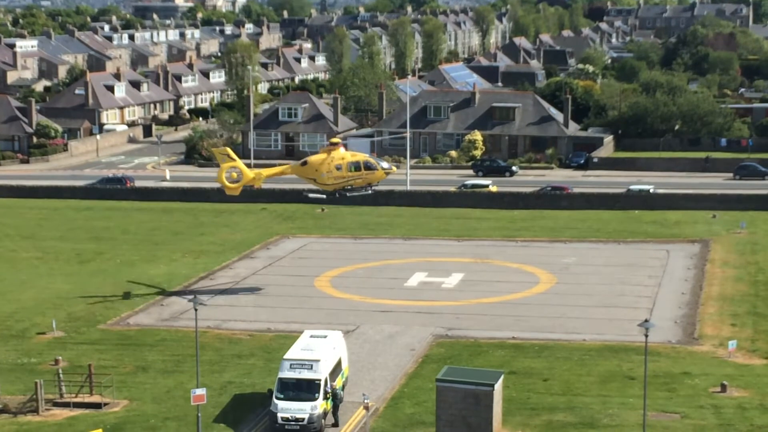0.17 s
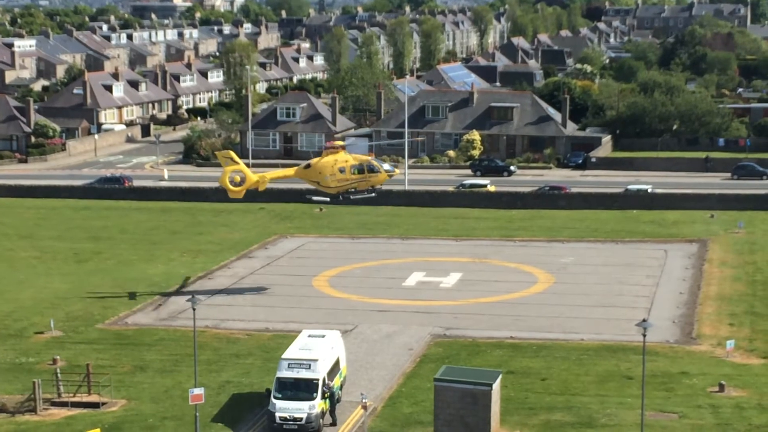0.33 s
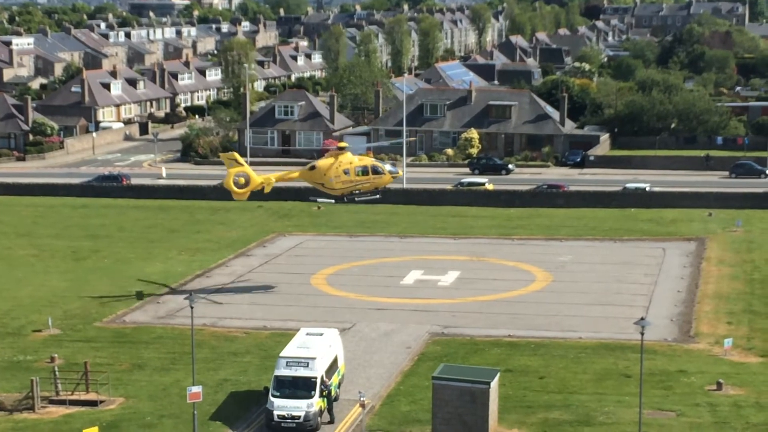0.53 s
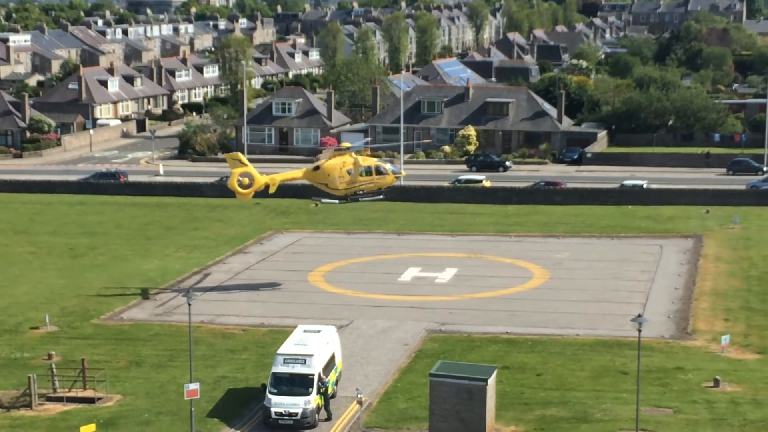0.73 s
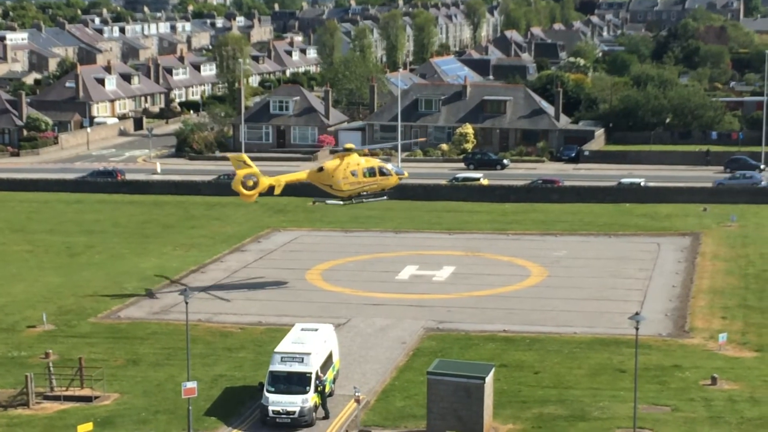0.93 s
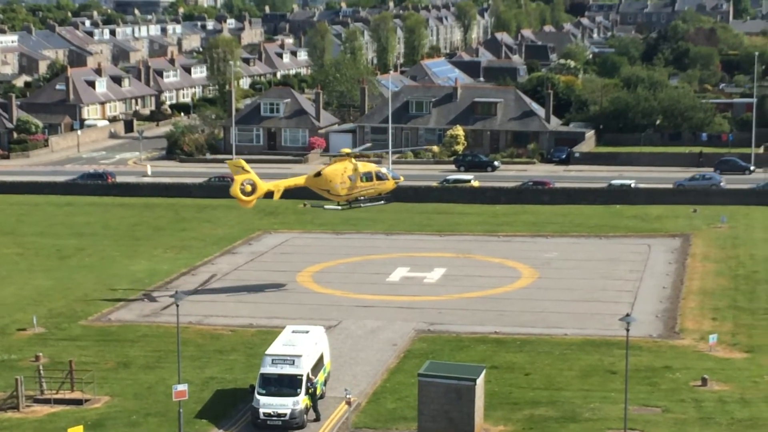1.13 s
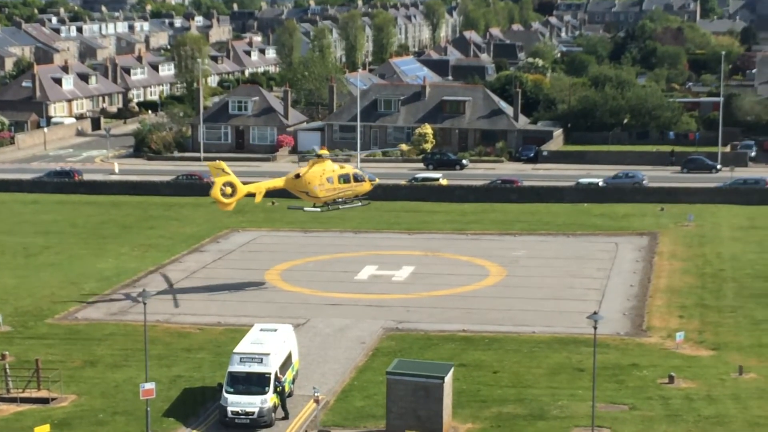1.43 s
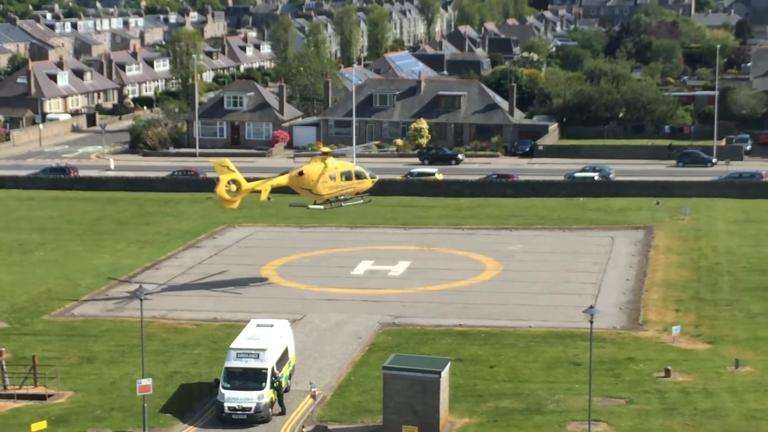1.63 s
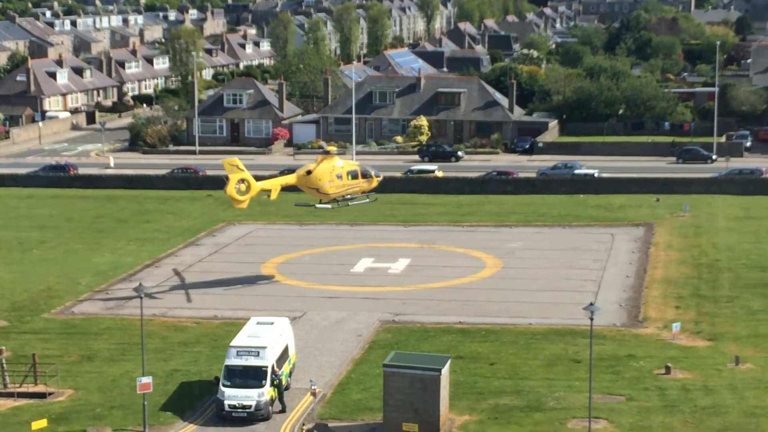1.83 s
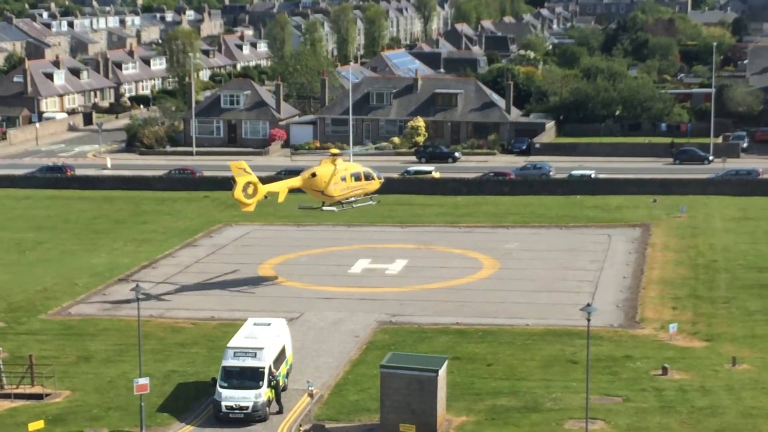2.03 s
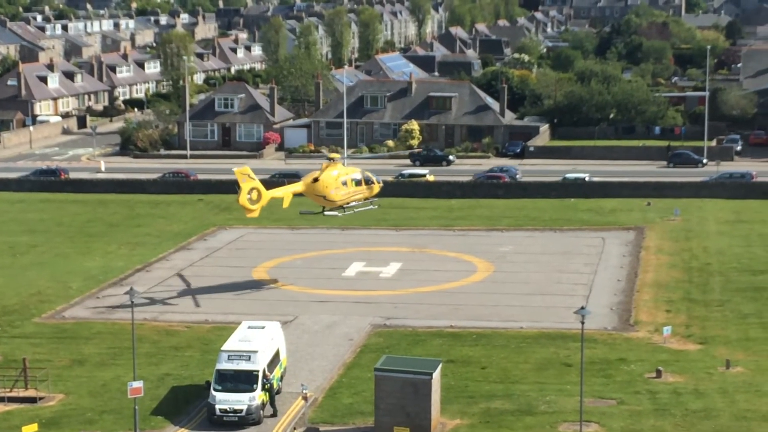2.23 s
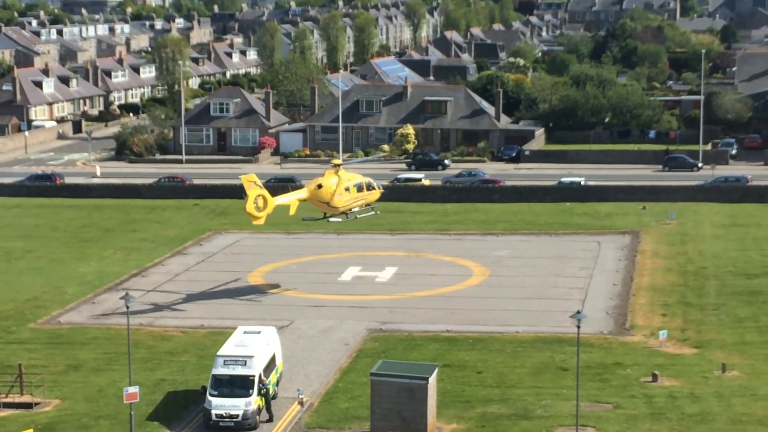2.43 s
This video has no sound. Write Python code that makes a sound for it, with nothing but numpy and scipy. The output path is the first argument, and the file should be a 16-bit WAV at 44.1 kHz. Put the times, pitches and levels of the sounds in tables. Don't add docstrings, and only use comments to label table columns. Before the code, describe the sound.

A distant helicopter hovers over an open lawn, a deep, rapid rotor drone swelling and dipping, with thin fuzzy fan and turbine whistles, heard from a high window over low air rumble and dull town wash.

```python
import sys
import numpy as np
from scipy import signal
from scipy.fft import next_fast_len
from scipy.io import wavfile
from scipy.ndimage import uniform_filter1d

SR = 44100
rng = np.random.default_rng(int(sys.argv[2]) if len(sys.argv) > 2 else 0)


def generate_wav(signal):
    frames = np.transpose(np.atleast_2d(signal))
    scaled = np.clip(frames, -1, 1) * 32767
    pcm = np.round(scaled).astype(np.int16)
    wavfile.write(sys.argv[1], SR, pcm)


def natural_amplitude(level_db):
    exponent = np.asarray(level_db, float) / 20
    return 10 ** exponent


N = 113778
T = np.arange(N) / SR
BLADE_HZ, SPEED_UP = 27.43, 0.0593


def evened(x):
    return x / np.sqrt(np.mean(abs(x) ** 2) + 1e-20)


def curve(rows, column):
    rows = np.array(rows, float)
    return np.interp(T, rows[:, 0], rows[:, column])


def drift(top_hz):
    t = T[::64, None]
    jitter, phase = rng.random((2, 24))
    hz = top_hz * (np.linspace(-1, 1, num=24) + (jitter - 0.5) / 12) ** 3
    z = evened(np.exp(2j * np.pi * (hz * t + phase)).sum(axis=1))
    return np.interp(T, t[:, 0], z.real) + 1j * np.interp(T, t[:, 0], z.imag)


def swells(rows, which):
    total = 0
    for k, centre, length, db in rows:
        if round(k) == which:
            total = total + db * np.cos(np.pi * np.clip((T - centre) / length, -0.5, 0.5)) ** 2
    return total


# time in seconds, facing in dB, thump level in dB.
TURN = [(0, 0, -54.5), (.4, -2, -58), (.65, 0.5, -55), (.82, -3, -48), (1.0, 1, -53), (1.25, 2.5, -56.5),
        (1.55, 2, -53.5), (1.8, -9.5, -48), (2.1, -9.5, -51), (2.35, -9, -46.5), (2.58, -9.5, -51)]


def facing():
    return curve(TURN, 1)


def blade_phase():
    return 2 * np.pi * (BLADE_HZ + SPEED_UP * T / 2) * T


def thump():
    tone = (1 + 0.34 * drift(8.0)) * np.exp(2j * blade_phase())
    return natural_amplitude(curve(TURN, 2)) * tone.real


# time in seconds, pitch in Hz, level in dB.
BOOM = [(0, 189.5, -35), (.06, 189.7, -28), (.16, 188.8, -42), (.22, 190.2, -34.5), (.36, 191.5, -29),
        (.56, 192.5, -34.5), (.61, 192.5, -28.5), (.85, 190.2, -32), (.9, 190, -41), (.97, 190.3, -34.5),
        (1.11, 190.6, -40.5), (1.36, 191.9, -33), (1.74, 191.7, -32), (2.01, 191.9, -39.5),
        (2.1, 191.9, -35), (2.18, 191.9, -40), (2.29, 191.8, -37), (2.58, 192.5, -47.5)]
# blade order, centre in seconds, length in seconds, change in dB.
NULLS = [(7, 0.027, 0.05, 3), (7, .99, .14, 3), (7, 1.88, .1, 3), (7, 2.1, .1, 2), (7, .26, .1, 0.5),
         (7, .68, 0.074, -1), (7, 1.2, .08, -11), (7, 1.2, 0.13, 3), (7, 1, 0.12, -3), (7, 1.82, 0.1, -9),
         (7, 2.4, 0.074, -9), (7, 2.7, 0.11, -15), (7, 2.47, 0.1, 2)]


def bay_boom():
    flutter = 1 + 0.15 * drift(11)
    tone = flutter * np.exp(2j * np.pi * np.cumsum(curve(BOOM, 1)) / SR)
    return natural_amplitude(curve(BOOM, 2) + swells(NULLS, 7)) * tone.real


# order as a multiple of the beat, level in dB.
BLADES = [(3, -60), (4, -61.5), (5, -55), (6, -54), (8, -54), (9, -60), (11, -54.5), (12, -55.5),
          (13, -56.5), (14, -58.5), (15, -62), (16, -69), (17, -69), (18, -57.5), (19, -63.5), (20, -60),
          (21, -68), (22, -74.5), (24, -73.5)]
# blade order, centre in seconds, length in seconds, change in dB.
GLINTS = [(5, 0.25, 0.71, 5), (5, .5, 0.22, 11), (18, 2.52, .15, 7), (11, 2.0, .6, -3), (6, 1.58, .12, 5),
          (5, 2.9, 0.18, 2), (5, .73, .1, 6), (5, 1.2, .2, -6), (5, 2.5, .2, -5), (8, 2.45, .2, -6),
          (5, 1.45, .5, -6.5), (6, 0.058, 0.22, 4), (6, .78, .25, 3.5), (6, 1.85, .9, 4.5), (8, 0.4, .2, 4),
          (8, 0.74, 0.62, 7.5), (8, 1.55, .15, 4), (8, 2.6, .15, 11.5), (8, 1.5, 0.28, -10),
          (11, .05, 0.25, 2), (11, .75, 0.17, -10), (11, 1.05, .3, 4), (11, 1.35, 0.17, -7),
          (11, 1.55, .15, 5), (12, 0.11, 0.69, 5), (12, 0.562, .15, 3.5), (12, .85, 0.5, -8.5),
          (12, 1.19, 0.31, 1.5), (13, .65, 0.28, 3.5), (13, 1.15, 0.73, 2.5), (13, 1.8, 0.6, 6.5),
          (14, .15, .2, 3), (14, 1.33, 0.2, 8), (14, .85, 0.45, -5.5), (15, 1.15, .5, 3.5),
          (16, 1.34, 0.18, 10.5), (18, 0.45, .25, 5), (18, .85, 0.19, 6), (18, 1.186, 0.13, 5),
          (18, 1.7, .3, 2.5), (18, 0.68, .15, -6.5), (19, 0.65, .3, 2.5), (19, 0.95, 0.18, 7),
          (19, 1.45, .2, 7.5), (20, .62, 0.3, 8.5), (20, 0.58, 0.12, -5), (20, 0.2, 0.12, -3),
          (20, 1, 0.13, 5), (20, 1.1, .3, 1)]


def blade_orders():
    steady, fade_hz = 1.7, 9.0
    phase_spread = 1.8
    phase = blade_phase()
    out = np.zeros(N)
    for order, db in BLADES:
        share = np.clip((order - 4) / 8, 0, 1)
        level = db + share * facing() + swells(GLINTS, round(order))
        tone = np.exp(1j * (round(order) * phase + phase_spread * rng.standard_normal()))
        paths = (steady + drift(fade_hz)) * tone
        out = out + natural_amplitude(level) * paths.real / np.hypot(steady, 1)
    return out


# time in seconds, level in dB.
ECHO = [
    (0, -50),
    (.2, -42),
    (.45, -46.5),
    (.52, -60.5),
    (1.0, -56),
    (1.12, -52),
    (1.5, -41.5),
    (1.75, -46.5),
    (1.9, -54),
    (2.58, -68),
]


def wall_echo():
    tone = (1 + 0.088 * drift(11.0)) * np.exp(10j * blade_phase())
    return natural_amplitude(curve(ECHO, 1)) * tone.real


def rotor():
    return np.sqrt(2) * (thump() + bay_boom() + blade_orders() + wall_echo())


def resonate(x, hz, width):
    carrier = np.exp(2j * np.pi * hz * T)
    r = np.exp(-np.pi * abs(width) / SR)
    smooth = signal.lfilter([1], np.convolve([1, -r], [1, -r]), x / carrier)
    return (carrier * smooth).real


def narrow_band(hz, width):
    return evened(resonate(rng.standard_normal(N), hz, width))


def whistle(hz, width):
    band = signal.hilbert(narrow_band(hz, width), next_fast_len(N))[:N]
    return evened((band / (abs(band) + 0.2) ** 0.6).real)


def blade_chop():
    return 1 + 0.15 * np.cos(2 * np.pi * BLADE_HZ * T)


# pitch in Hz, width in Hz, level in dB, share of facing from 0 to 1.
WHISTLES = [
    (748, 5.8, -69, 0.46),
    (803, 17, -65, 0.34),
    (866, 40, -67, 0.22),
    (949.3, 48, -63.5, 0.48),
    (1128, 29, -63, 0.54),
]
# whistle number, centre in seconds, length in seconds, change in dB.
FLARES = [(0, 1.1, .9, 3), (1, 1.5, 0.16, 6), (1, 1.72, .12, 8), (1, 1.0, .2, -10), (2, 1.35, .2, 5.5),
          (3, 1.2, .2, 6), (3, 1.22, .25, -5), (1, .55, .2, -3), (4, .62, .12, 4), (3, 1.3, .14, 9),
          (3, 0.54, 1.0, -6.5), (3, 2.15, .4, 6), (4, 0.995, 0.13, 3), (4, 1.4, 0.3, 2),
          (4, 0.895, 0.14, -4), (4, 1.95, .6, -7), (4, 2.45, .3, 4.5), (9, 1.97, 0.2, 9.5),
          (9, 1.16, 0.18, 6), (9, .03, .1, 6)]


def fan_whistles():
    out = np.zeros(N)
    for k, (hz, width, db, share) in enumerate(WHISTLES):
        waver = 1.0 * drift(4.0).real
        level = db + share * facing() + waver + swells(FLARES, k)
        out = out + natural_amplitude(level) * whistle(hz, width)
    return out * blade_chop()


# pitch in Hz, width in Hz, level in dB.
WHINES = [
    (1954, 80, -68.5),
    (2050, 130, -67.5),
    (2185, 250, -71.5),
    (2382, 28, -72.5),
    (3540, 99, -81),
]
# time in seconds, level in dB.
EXHAUST = [(0, 4.5), (.2, -4.5), (.48, 4.5), (.85, -4.5), (1.22, 2), (1.45, -2), (1.7, 0), (1.8, -1),
           (2.0, 2), (2.12, -0.5), (2.28, 5.5), (2.45, -7), (2.58, -9)]


def turbine_whines():
    out = np.zeros(N)
    for k, (hz, width, db) in enumerate(WHINES, len(WHISTLES)):
        waver = 0.94 * drift(14.0).real
        level = db + curve(EXHAUST, 1) + waver + swells(FLARES, k)
        out = out + natural_amplitude(level) * narrow_band(hz, width)
    return out * blade_chop()


# start in seconds, peak level in dB, pitch in Hz.
PUFFS = [(0.0403, -52.5, 1960), (0.1281, -54, 1950), (0.156, -54, 2010), (0.2627, -51.5, 1970),
         (0.3252, -54.5, 1870), (0.4194, -52, 2090), (0.4728, -49, 1980), (0.7068, -56, 2010),
         (0.7437, -49, 1930), (0.7701, -50, 2060), (0.8026, -52, 2170), (0.9467, -55, 2010),
         (1.0181, -52, 2020), (1.0964, -50, 2140), (1.1218, -48, 2026), (1.1837, -49.5, 1960),
         (1.2231, -48, 2040), (1.258, -54, 2084), (1.3848, -49, 2050), (1.442, -48.5, 1940),
         (1.5748, -46.5, 1990), (1.6566, -49, 1990), (1.6954, -44, 1982), (1.721, -45, 1940),
         (1.8317, -49, 2000), (1.938, -48.5, 2120), (1.9594, -53, 2040), (2.0253, -48, 2074),
         (2.0627, -51.5, 2150), (2.1949, -51, 2000), (2.2179, -51, 2050), (2.2492, -54, 1960),
         (2.2682, -46, 2070), (2.4578, -56, 2070)]


def exhaust_puffs():
    length, trim_db = 0.021, -4.5
    out = np.zeros(N + SR)
    t = np.arange(0, length, 1 / SR)
    envelope = np.sin(np.pi * t / length) ** 2
    for (start, db, hz), phase in zip(PUFFS, rng.random(len(PUFFS))):
        at = round(start * SR)
        out[at:at + len(t)] += natural_amplitude(db + trim_db) * envelope * np.sin(2 * np.pi * (hz * t + phase))
    return out[:N]


def noise(shape, patchy_db, follow):
    frames, hz = N // 512 + 5, np.fft.rfftfreq(2048, 1 / SR)
    real, imaginary, patches = rng.standard_normal((frames, 1025, 3)).T
    patches = uniform_filter1d(patches, size=10, axis=0)
    patches = evened(uniform_filter1d(patches, size=14, axis=1))
    shape_hz, shape_db = np.transpose(shape)
    tilt = np.interp(np.log(hz + 1), np.log(shape_hz), shape_db, left=-70, right=-70)[:, None]
    spectra = (real + 1j * imaginary) * natural_amplitude(tilt + patchy_db * patches)
    sound = signal.istft(spectra, nperseg=2048, noverlap=1536)[1][:N]
    return evened(sound) * natural_amplitude(follow * facing())


# frequency in Hz, density in dB per Hz.
WASH = [(290, -23), (520, -2), (950, -2.5), (1040, -7.5), (1300, -4), (2300, -4.5), (3600, -17.5),
        (6500, -36)]


def town_wash():
    return natural_amplitude(-54.5) * noise(WASH, patchy_db=2.0, follow=0.15)


# frequency in Hz, density in dB per Hz.
RUMBLE = [(20, -19), (45, -9), (85, -12), (135, 2), (190, -0.5), (235, 1), (290, -10), (600, -20)]


def draught_rumble():
    return natural_amplitude(-46) * noise(RUMBLE, patchy_db=1.0, follow=0.3)


# start in seconds, length in seconds, then bands of pitch in Hz, width in Hz, level in dB.
SQUEAL = (2.42, .15, [(4740, 70, -83), (9680, 50, -90)])


def brake_squeal():
    start, length, bands = SQUEAL
    swell = np.sin(np.pi * np.clip((T - start) / length, 0, 1))
    return swell * sum(natural_amplitude(db) * whistle(hz, width) for hz, width, db in bands)


# frequency in Hz, density in dB per Hz.
HISS = [(2000, -7), (4000, 2.5), (6000, 3.5), (9000, -2), (16000, -7)]


def microphone_hiss():
    return natural_amplitude(-79) * noise(HISS, patchy_db=0.7, follow=0.05)


def scene():
    helicopter = rotor() + fan_whistles() + turbine_whines() + exhaust_puffs()
    background = town_wash() + draught_rumble() + brake_squeal()
    return (helicopter + background)[None]


def top_cut(x):
    return signal.sosfilt(signal.butter(12, 15270, fs=SR, output="sos"), x)


def record(dry):
    heard = dry + microphone_hiss()
    edge = np.clip(np.minimum(T, T[::-1]) / 0.001, 0, 1)
    heard = heard * np.sin(np.pi / 2 * edge) ** 2
    return top_cut(heard)


dry = scene()
out = record(dry)
generate_wav(out)
```